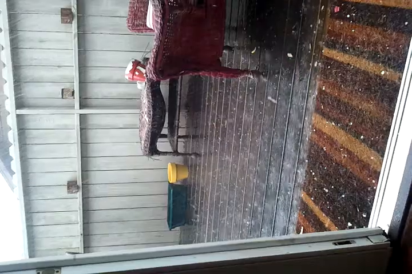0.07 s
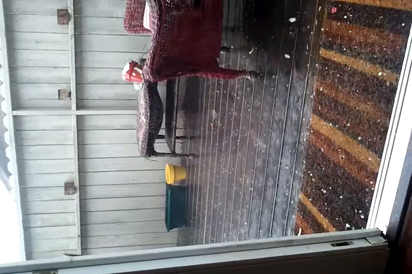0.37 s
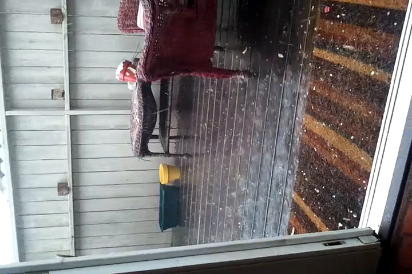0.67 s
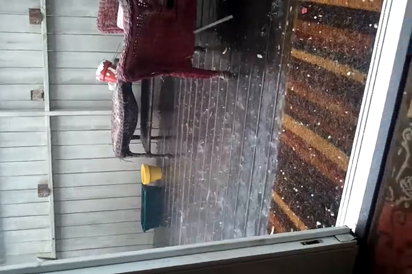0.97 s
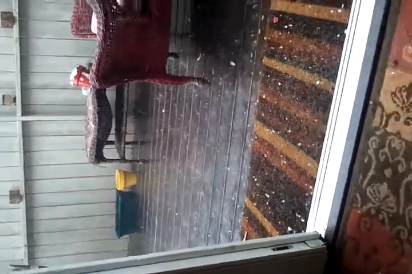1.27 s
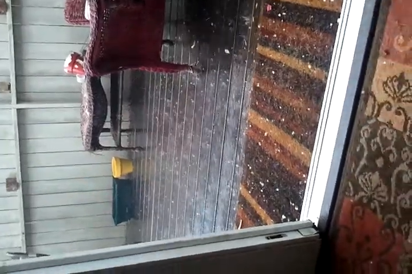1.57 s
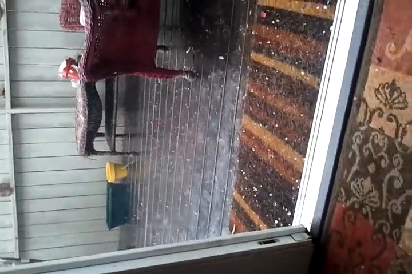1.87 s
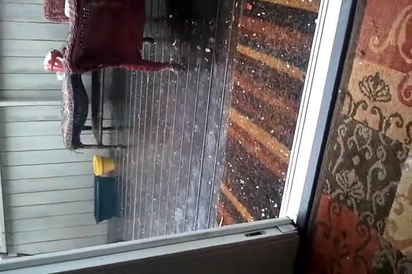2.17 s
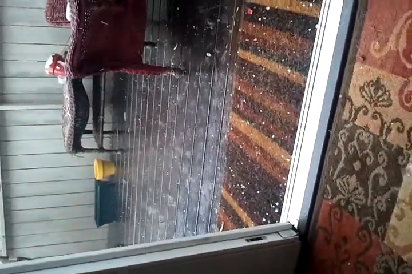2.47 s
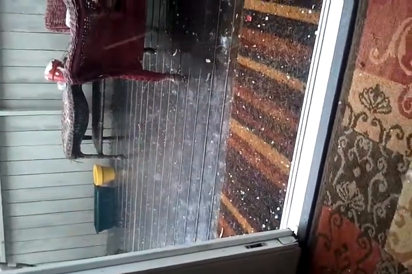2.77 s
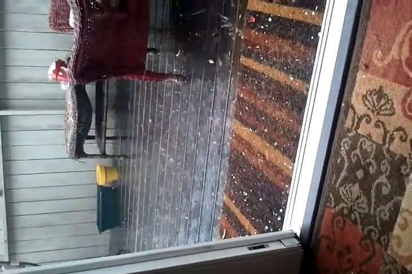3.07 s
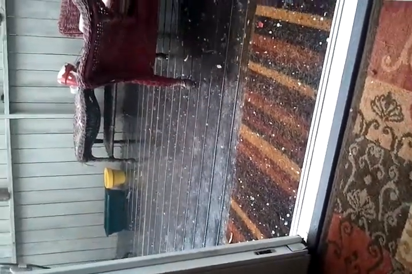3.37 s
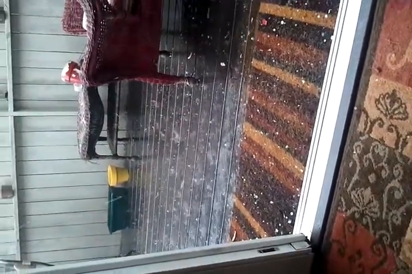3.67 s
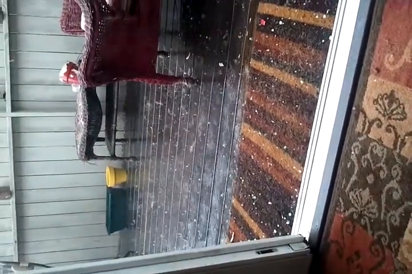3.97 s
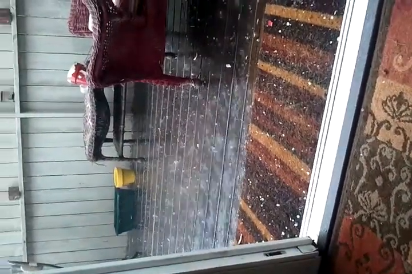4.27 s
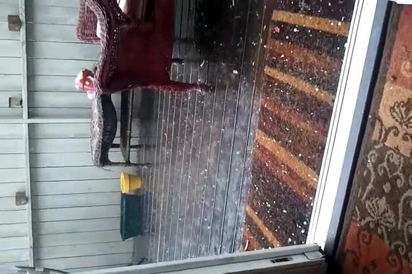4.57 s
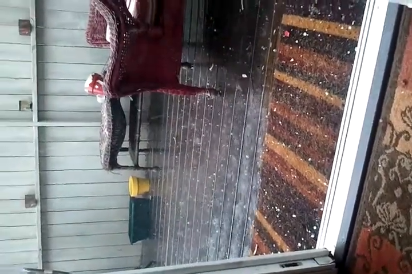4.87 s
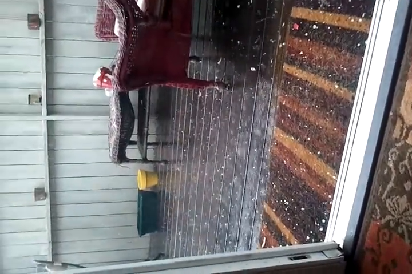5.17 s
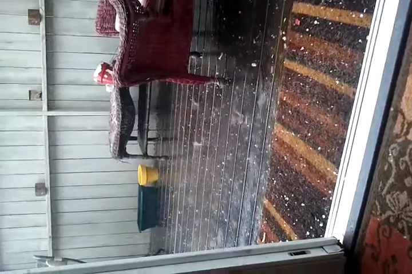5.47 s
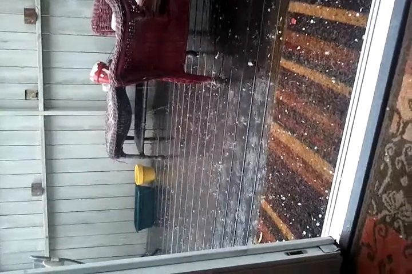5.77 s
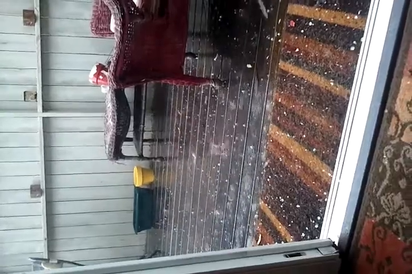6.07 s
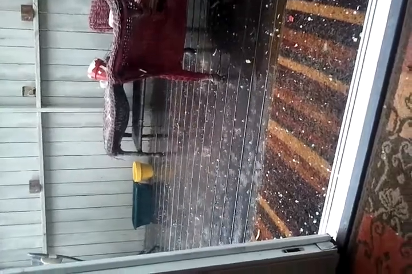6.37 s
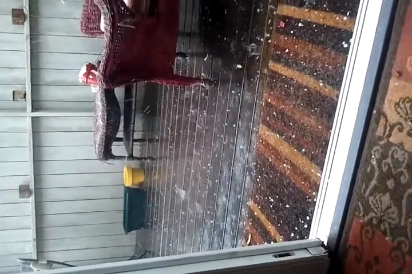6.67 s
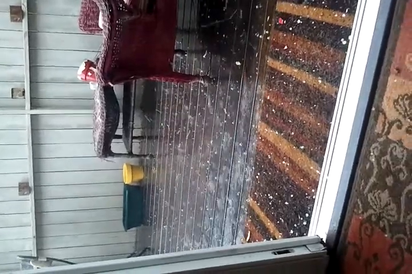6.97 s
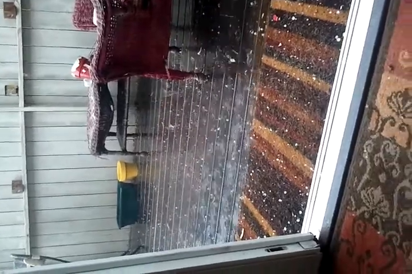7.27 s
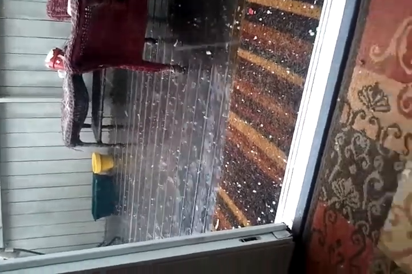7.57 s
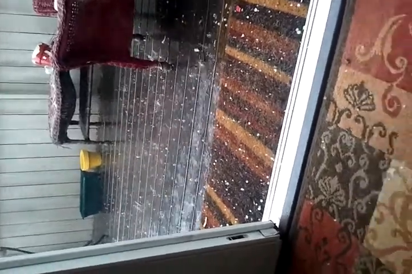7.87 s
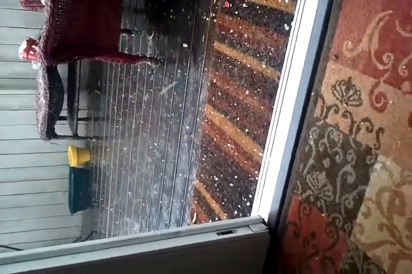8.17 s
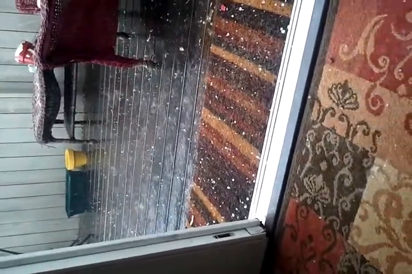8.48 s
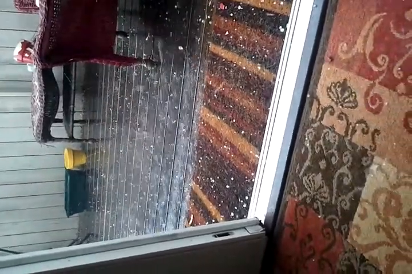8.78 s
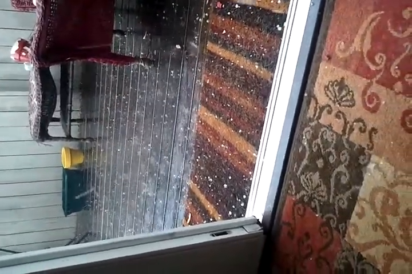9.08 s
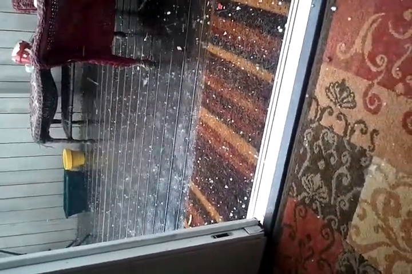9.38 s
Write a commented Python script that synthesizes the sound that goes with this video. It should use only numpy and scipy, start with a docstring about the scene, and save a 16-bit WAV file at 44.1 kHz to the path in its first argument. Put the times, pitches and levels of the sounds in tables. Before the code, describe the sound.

Heavy rain and hail roar on a wooden porch, with sharp clicks, hollow knocks and a roll of distant thunder.

```python
"""Heavy rain and hail on a wooden porch deck, heard from the open door, over a roll of distant thunder.
Countless drops and stones superpose into a roar, coloured by the resonances of the deck. Near impacts
excite damped modes: hard stones click, heavy ones knock on hollow boards. The sound fades in after
a moment, through a narrow-band microphone whose limiter ducks the storm after the hardest hits."""
import sys
import numpy as np
from scipy import signal
from scipy.fft import rfft, irfft, next_fast_len
from scipy.io import wavfile
from scipy.ndimage import uniform_filter1d

SR = 44100
rng = np.random.default_rng(int(sys.argv[2]) if len(sys.argv) > 2 else 0)


def wav_out(sig):
    """Save sig, one row per channel (or a flat mono array), as 16-bit PCM at SR to the path in sys.argv[1]."""
    wavfile.write(sys.argv[1], SR, np.round(np.clip(np.atleast_2d(sig).T, -1, 1) * 32767).astype(np.int16))


N = 425124
BAND_EDGE_HZ = 7430


def gain_of(db):
    """Amplitude ratio of a level in decibels."""
    return 10 ** (np.asarray(db) / 20)


def unit_rms(x):
    """Normalisation of each row to unit mean power."""
    return x / np.sqrt(np.mean(x ** 2, axis=-1, keepdims=True) + 1e-20)


def level_at(spectrum, hz):
    """Interpolation of a spectrum's level on a logarithmic frequency axis."""
    f, db = np.transpose(spectrum)
    return np.interp(np.log(hz + 1), np.log(f + 1), db)


def envelope(rows, column):
    """Interpolation of one level column over time, as a gain for every sample."""
    rows = np.asarray(rows)
    return gain_of(np.interp(np.arange(N) / SR, rows[:, 0], rows[:, column]))


def filtered(x, gain_at):
    """Zero-phase filtering: the spectrum is multiplied by a gain that depends on frequency."""
    length = x.shape[-1]
    size = next_fast_len(length + 512)
    return irfft(rfft(x, size) * gain_at(np.fft.rfftfreq(size, 1 / SR)), size)[..., :length]


def low_pass(x, hz):
    """Steep band limiting by convolution with a windowed sinc."""
    return signal.oaconvolve(x, signal.firwin(801, hz, window=("kaiser", 9), fs=SR), "same")


def superpose(onsets_s, sounds):
    """Linear superposition of one row of sound at each onset."""
    at = np.round(np.abs(onsets_s) * SR).astype(int)[:, None] + np.arange(sounds.shape[1])
    return np.bincount(at.ravel(), sounds.ravel(), N)[:N]


def fluctuation(slow_hz, fast_hz, depth_db):
    """Amplitude modulation: sinusoids of random phase sum to a wandering level of rms depth_db."""
    t = np.arange(0, N, 100) / SR
    rates = np.geomspace(slow_hz, fast_hz, 20)[:, None]
    swing = np.sum(np.sin(2 * np.pi * (rates * t + rng.random(rates.shape))) / np.sqrt(rates), axis=0)
    return gain_of(depth_db * np.interp(np.arange(N) / SR, t, unit_rms(swing)))


# spectral density of distant thunder: f/Hz, relative level/dB
THUNDER_SPECTRUM = [(12, -8), (26, 0), (50, 0), (80, -3.5), (125, -11), (180, -12.5), (300, -36),
                    (700, -74)]


def rumble(shape):
    """Atmospheric absorption: noise that has lost its treble over the distance."""
    noise = rng.standard_normal(shape)
    return unit_rms(filtered(noise, lambda hz: gain_of(level_at(THUNDER_SPECTRUM, hz))))


# pressure pulses that stand out of the roll: t/s, peak level/dB, width/s
THUNDER_PULSES = [(2.633,-14.5,0.0042), (2.648,-18,0.0016), (2.733,-12,0.0047), (2.994,-17,0.0024),
                  (3.047,-10.5,0.0055), (3.415,-15,0.0056), (3.737,-11,0.0037), (3.89,-15,0.0043),
                  (4.478,-19,0.0028), (4.516,-14,0.0023), (4.87,-22,0.002), (4.967,-15,0.0031),
                  (5.358,-10,0.0028), (5.39,-18,0.0023), (5.52,-20,0.0054), (6.45,-17,0.0048),
                  (8.47,-26,0.0046), (8.515,-17,0.0033), (8.565,-19,0.005)]


def booms():
    """Each pressure pulse is a compression between two rarefactions, trailed by a decaying rumble."""
    onset_s, db, width_s = np.transpose(THUNDER_PULSES)
    lead_s, tail_s = .02, .05
    t = np.arange(SR // 3) / SR - lead_s
    u = t / width_s[:, None]
    pulse = (1 - u ** 2) * np.exp(-u ** 2 / 2)
    tail = gain_of(-14) * rumble(u.shape) * np.clip(u, 0, 1) * np.exp(-t / tail_s)
    return superpose(onset_s - lead_s, (pulse + tail) * gain_of(db)[:, None])


def thunder():
    """Modulated low noise: the roll swells, tumbles at random and dies away beneath the booms."""
    start_s, rise_s, end_s, fade_s = 2.32, 0.15, 6.1, 0.61
    t = np.arange(N) / SR
    swell = np.clip(np.minimum((t - start_s) / rise_s, (end_s - t) / fade_s), 0, 1)
    roll = gain_of(-28.5) * rumble(N) * swell
    return roll * fluctuation(slow_hz=4.5, fast_hz=12, depth_db=2.5) + booms()


def raindrops(per_s, spread_db):
    """Shot noise: drops strike the boards as independent, band-limited impulses."""
    strength = gain_of(-spread_db * np.log(rng.random(N) + .08))
    ticks = strength * rng.choice([-1, 1], N) * (rng.random(N) < per_s / SR)
    return unit_rms(filtered(ticks, lambda hz: hz < BAND_EDGE_HZ))


# modes of a struck spot: frequency ratio to its pitch, relative level/dB
SPOT_MODES = [(1.002, 2.5), (1.11, -11.5), (1.498, -11)]


def impacts(ring_hz, ring_t60, ring_db, octaves, echo_db, echo_t60, samples, crack_s=.0036):
    """Impact excitation, one row a stone: a noise crack, damped modes, and shards and porch echoes."""
    t, pitch = np.arange(samples) / SR, ring_hz[:, None]

    def band(hz):
        """Gaussian passband about the pitch, with a standard deviation of `octaves`."""
        return np.exp(-.5 * (np.log2((hz + 1) / pitch) / octaves) ** 2) * (hz < BAND_EDGE_HZ)

    grit = unit_rms(filtered(rng.standard_normal((len(pitch), samples)), band))
    crack = np.tanh(grit) * np.exp(-(t / crack_s) ** 4)
    # every spot has its own paths to the walls, so no two stones echo alike
    echoes = grit * gain_of(np.reshape(echo_db, (-1, 1)) - 60 * t / echo_t60) * (t > crack_s)
    modes = sum(gain_of(db) * np.sin(2 * np.pi * ratio * pitch * t) for ratio, db in SPOT_MODES)
    ring = modes * gain_of(ring_db - 60 * t / np.reshape(ring_t60, (-1, 1)))
    attack = 1 - np.exp(-(t / .0013) ** 2)
    fade_out = np.minimum(1, 4 * (1 - t / t[-1]))
    return (crack + ring + echoes) * attack * fade_out


def shower(count, low_hz, high_hz, ring_cycles, spread_db=0.0, **strike):
    """Random impacts on spots of equal Q: each ring falls 60 dB in ring_cycles periods."""
    when, spot, weight = rng.random((count, 3)).T
    pitch = low_hz + (high_hz - low_hz) * spot
    hits = impacts(pitch, ring_t60=ring_cycles / pitch, echo_db=-10, echo_t60=0.14, **strike)
    strength = gain_of(-spread_db * np.log(weight + .08))
    return unit_rms(superpose(when * N / SR, hits * strength[:, None]))


# broad spectral shaping of the roar: f/Hz, gain/dB
ROAR_SHAPE = [(20, 11), (60, 8.5), (150, 0.5), (300, 4), (540, 1), (1150, -1), (1850, -1.5), (2800, -1.5),
              (4900, -2.5), (6200, -2), (7300, -3)]
# resonances of the deck and porch: f/Hz, width/Hz, lift/dB
DECK_RESONANCES = [(123, 12, 5.5), (200, 44, 2.5), (280, 44, 1), (740, 150, 5), (942, 198, 5),
                   (1295, 120, 3.5), (1506, 197, 5), (2193, 180, 3.5), (3340, 240, 3), (4160, 230, 2.5)]


def deck_response(hz):
    """Resonance: the deck and porch lift bands out of the broad spectrum of the roar."""
    lift_db = sum(db * np.exp(-2 * ((hz - f) / width) ** 2) for f, width, db in DECK_RESONANCES)
    return gain_of(level_at(ROAR_SHAPE, hz) + lift_db)


# strength of the downpour as gusts come and go: t/s, relative low level/dB, relative high level/dB
GUSTS = [(1.0, -23.5, -23.5), (1.2, -21.5, -23), (1.6, -22.5, -24), (2.35, -22, -22.5), (2.52, -23, -23.5),
         (2.9, -22, -22.5), (3.95, -24, -22.5), (4.3, -22, -23.5), (5.1, -23, -22), (5.45, -25.5, -24),
         (5.7, -24, -24.5), (6.3, -23, -20.5), (6.55, -23.5, -23), (7.0, -22.5, -21.5), (7.7, -22.0, -21),
         (8.1, -23, -22), (8.7, -22, -21), (9.6, -23, -22)]


def downpour():
    """Incoherent summation: far rain, near drops and drumming, spattering hail merge into a roar."""
    wash = unit_rms(filtered(rng.standard_normal(N), lambda hz: hz < BAND_EDGE_HZ))
    drops = raindrops(per_s=3200, spread_db=0.5)
    drum = shower(count=1600, low_hz=421, high_hz=2435, ring_cycles=55, ring_db=-9,
                  crack_s=0.0044, octaves=0.86, samples=1300)
    spatter = shower(count=3000, low_hz=2035, high_hz=7470, ring_cycles=120, ring_db=-24,
                     crack_s=0.0037, octaves=0.66, samples=700)
    roar = filtered(gain_of(0.5) * wash + gain_of(-8) * (drops + drum) + spatter, deck_response)
    # the boards carry the lower part of the roar, the spatter the upper part
    low = filtered(roar, lambda hz: 1 / (1 + (hz / 2200) ** 6))
    gusting_low = gain_of(-0.73) * unit_rms(low) * envelope(GUSTS, column=1)
    gusting_high = gain_of(-2) * unit_rms(roar - low) * envelope(GUSTS, column=2)
    flurries = fluctuation(slow_hz=3.5, fast_hz=16, depth_db=0.58)
    return (gusting_low + gusting_high) * flurries


def patter():
    """Sparse impacts are heard singly: small stones tick nearby, harder when the storm swells."""
    stones = shower(count=90, low_hz=2460, high_hz=5840, ring_cycles=150, ring_db=2,
                    spread_db=-1.5, octaves=0.76, samples=1800)
    return gain_of(-16) * stones * envelope(GUSTS, column=2)


# heavy stones on hollow boards: t/s, relative level/dB, ring f/Hz, ring T60/s
BOARD_HITS = [(1.152,-9,530,0.033), (1.243,-8,630,0.054), (1.655,-7.5,724,.05), (2.0998,-6,1015,0.034),
              (2.349,-9,1000,0.043), (2.876,-10.5,755,0.061), (2.941,-9,830,0.08), (3.291,-7,1690,0.039),
              (5.617,-9.5,698,0.07), (5.618,-11.5,1810,0.053), (5.632,-10,1430,0.048), (5.668,-10,1410,.06),
              (5.68,-6.5,1050,0.055), (5.748,-9.5,770,0.041), (5.7565,-5,727,.055), (6.151,-7,700,.045),
              (6.315,-7,760,.045), (6.3538,-3.5,1210,0.032), (6.357,-6,944,0.081), (6.378,-6,910,0.063),
              (6.418,-11,860,0.046), (7.432,-9,1083,0.057), (7.525,-5.5,710,0.071), (7.664,-9.5,1656,0.12),
              (7.685,-5.5,1940,.05), (7.854,-11,600,0.03), (8.359,-7,1490,0.055), (8.391,-6.5,1590,0.046),
              (8.574,-9.5,1050,0.06), (8.66,-5,1790,0.051), (8.691,-6,1700,.065), (8.796,-10,420,.03),
              (9.057,-9,675,0.047), (9.221,-3.5,1023,0.051), (9.2906,-7,520,0.024)]


def hail_knocks():
    """Free vibration of a hollow board: the struck spot rings, and the whole board flexes with a thud."""
    onset_s, db, hz, t60 = np.transpose(BOARD_HITS)
    thud_hz, thud_t60, thud_db = 338, 0.067, -10.5
    hits = impacts(hz, ring_t60=t60, ring_db=-1.5, octaves=0.77, echo_db=-17, echo_t60=0.28, samples=4400)
    t = np.arange(hits.shape[1]) / SR
    board_hz = thud_hz * rng.uniform(0.87, 1.4, (len(onset_s), 1))
    thuds = np.sin(2 * np.pi * board_hz * t) * gain_of(thud_db - 60 * t / thud_t60)
    return gain_of(-7) * superpose(onset_s, (hits + thuds) * gain_of(db)[:, None])


# hard stones close by: t/s, relative level/dB, lower f/Hz, upper f/Hz, spray level re crack/dB
ICE_HITS = [(1.015,-2,5770,6600,-14), (1.084,-7.5,5340,5750,-11), (1.1366,-10,4500,5600,-7),
            (1.2,-9,4130,5500,-9), (1.2275,-5,2930,3880,-12), (1.2448,-8,3340,3960,-19),
            (1.381,-9,5040,6100,-10), (1.387,-6,4170,4400,-16), (1.394,-5.5,5220,5750,-16),
            (1.473,-10,4140,4700,-10), (1.716,-4,2990,3500,-17), (1.75,-7,3200,3900,-9),
            (1.87,-8.5,3700,4560,-12), (2.022,-6,2150,2580,-20), (2.027,-12,1750,1950,-20),
            (2.06,-7.5,2950,3200,-22), (2.137,-6,3330,5600,-20), (2.236,-2,2420,3560,-40),
            (2.307,-4.5,3980,5900,-17), (2.3265,-8,5470,6290,-15), (2.33,-3.5,1980,3600,-16),
            (2.348,-5.5,4230,5400,-10), (2.4,-6,5500,6630,-14), (2.421,-6,4200,5200,-12),
            (2.6528,-13.5,2440,4200,-1), (2.665,-6,2620,5000,-12), (2.7025,0,1770,3010,-22),
            (2.768,-8,2720,4600,-8), (2.905,-9.5,2700,5440,-17), (2.957,-9,3050,3400,-19),
            (3.1244,-7.5,4320,5240,-15), (3.199,-8,3560,4400,-19), (3.2995,-2,2670,6200,-14),
            (3.323,-5.5,2800,3100,-22), (3.339,-10,3500,4700,-14), (3.596,-10.5,4600,5430,-17),
            (3.667,-9,4800,5900,-21), (3.7829,-10,2550,5200,-12), (3.863,-1.5,3440,4390,-20),
            (3.938,-11,4150,4400,-21), (4.1425,-3.5,6160,6900,-9), (4.154,-9,3360,3650,-7),
            (4.182,-8,5200,6950,-13), (4.202,-11,4100,5600,-15), (4.313,-16,4300,4550,-18),
            (4.584,-12,5700,6100,-13), (4.607,-8,5635,5950,-10), (4.7565,-6,3200,3500,-13),
            (4.826,-12,3760,4500,-12), (4.9623,-6.5,3380,4300,-23), (5.009,-3,3150,4100,-22),
            (5.575,-8.5,5430,5900,-21), (5.7838,-10,3140,4300,-16), (5.8376,-4,3100,3960,-20),
            (5.871,-8,3230,4500,-21), (5.9034,-8,4460,5400,-16), (6.0125,-1.5,3600,4020,-30),
            (6.0335,-5,3150,3400,-14), (6.058,-9,4000,4910,-15), (6.085,-9,3320,3960,-5),
            (6.1974,-7,3130,4300,-25), (6.2595,-4,2170,6630,-15), (6.275,-11,5500,6460,-15),
            (6.299,-6,1900,2760,-11), (6.3545,-5,2500,5340,-24), (6.399,-8,4950,5250,-17),
            (6.456,-4,4600,6290,-21), (6.6164,-6,3050,4400,-13), (6.804,-7.5,2070,3500,-14),
            (6.817,-12,4200,5200,-5), (6.841,-7,5000,6700,-16), (6.893,-4.5,3040,6460,-15),
            (6.9417,-1.5,3100,4790,-19), (6.974,-8.5,4650,5800,-15), (6.9935,-11,4500,4800,-15.5),
            (7.018,-7,4550,4800,-17), (7.054,-7,3960,4700,-24), (7.083,-2,3400,4080,-22),
            (7.1288,-5,3850,4100,-18), (7.1495,-3,3700,5860,-15), (7.3786,0.5,3750,5680,-30),
            (7.582,-7.5,2400,2760,-8), (7.634,-6,2160,6120,-5), (7.686,1.5,4430,5000,-14),
            (7.711,-5,4300,4740,-13), (7.858,-6.5,4610,5250,-19), (7.881,-8,2100,2350,-12),
            (7.9487,-12,3750,5200,-21), (7.971,-5,2650,6290,-11), (8.084,-10,4300,5080,-20),
            (8.3587,0.5,3720,6290,-18), (8.394,-4.5,5230,6950,-13), (8.659,-0.5,3160,6460,-17),
            (8.7495,-4,5170,6170,-9.5), (8.787,-3.5,5600,6460,-14), (8.943,-7,3400,3650,-16),
            (9.077,-6,2330,3530,-13), (9.08,-8,5470,6200,-13), (9.1704,1.5,4280,6600,-30),
            (9.222,-4,5200,6200,-18), (9.291,-12,4210,6000,-16), (9.357,-4,4330,6890,-23),
            (9.385,-7,5970,6950,-15)]


def hail_clicks():
    """Brief contact excites high modes: hard ice gives a crack, two thin rings and a spray of shards."""
    onset_s, db, lower_hz, upper_hz, spray_db = np.transpose(ICE_HITS)
    hits = sum(impacts(hz, ring_t60=0.016, ring_db=-1.5, octaves=0.42,
                       echo_db=spray_db, echo_t60=0.2, samples=3000)
               for hz in (lower_hz, upper_hz))
    return gain_of(-9.5) * superpose(onset_s, hits * gain_of(db)[:, None])


def scene():
    """Superposition of all sources at the doorway, in mono."""
    return (downpour() + patter() + hail_clicks() + hail_knocks() + thunder())[None]


def limiter(x, ceiling, release_s):
    """Peak limiting: the gain drops at once at a peak over the ceiling and recovers exponentially."""
    cut = 1 - ceiling / np.maximum(np.abs(x), ceiling)
    decay = np.arange(N) / SR / release_s
    held_cut = np.exp(np.maximum.accumulate(np.log(cut + 1e-9) + decay) - decay)
    return x * (1 - uniform_filter1d(held_cut, size=2))


# treble response of the microphone: f/Hz, gain/dB
MIC_RESPONSE = [(6150, 1), (6550, -4), (6900, -8), (7250, -17), (7450, -18)]


def record(dry):
    """A narrow-band microphone with a steady offset, which each duck of the limiter turns into a thump."""
    offset, opens_s = -.32, .786
    coloured = filtered(dry[0], lambda hz: gain_of(level_at(MIC_RESPONSE, hz)))
    limited = limiter(low_pass(coloured, BAND_EDGE_HZ) + offset, ceiling=.738, release_s=0.052)
    t = np.arange(N) / SR
    fade_in = np.interp(t, [opens_s, .89, 1.02], [.24, .55, 1]) * (t > opens_s)
    return low_pass(limited * uniform_filter1d(fade_in, size=40), hz=15800)[None]


dry = scene()
out = record(dry)
wav_out(out)
```